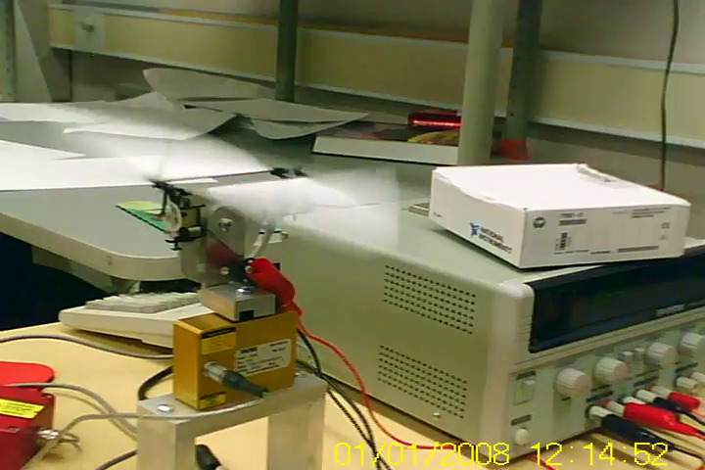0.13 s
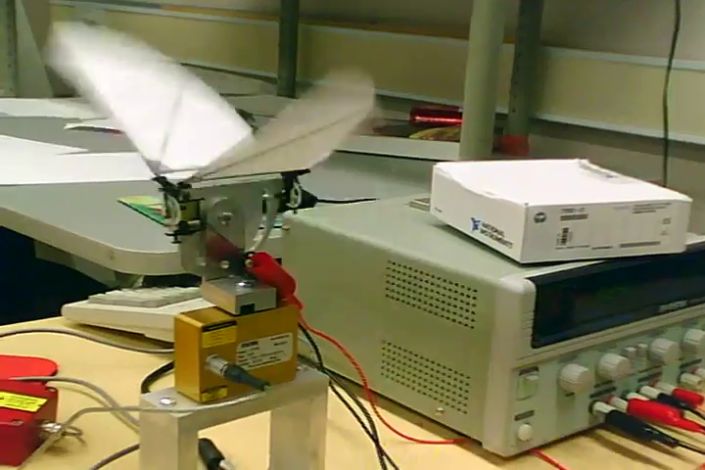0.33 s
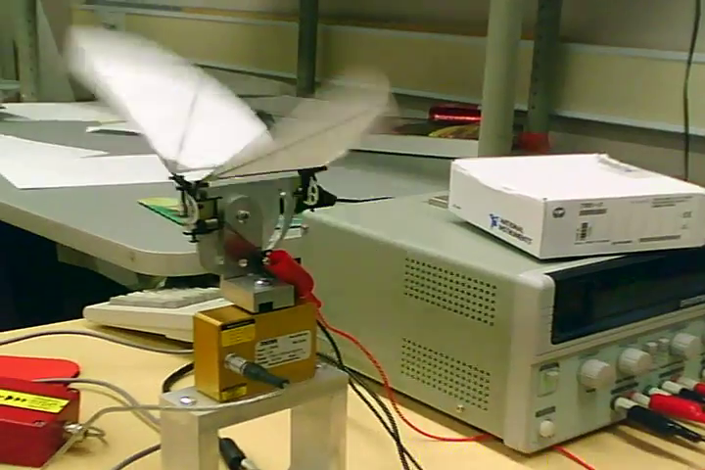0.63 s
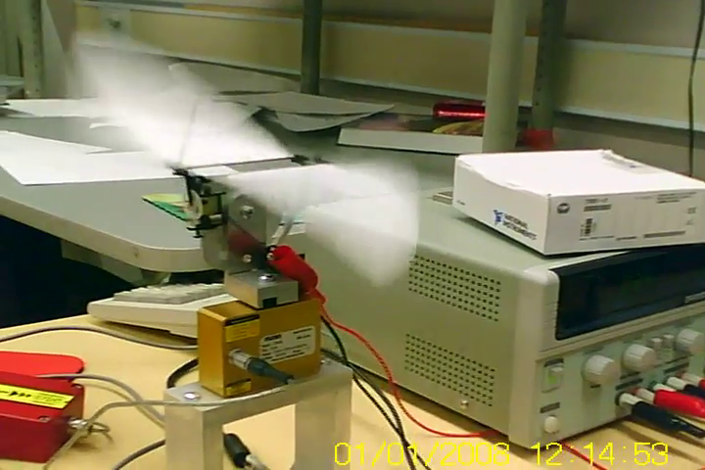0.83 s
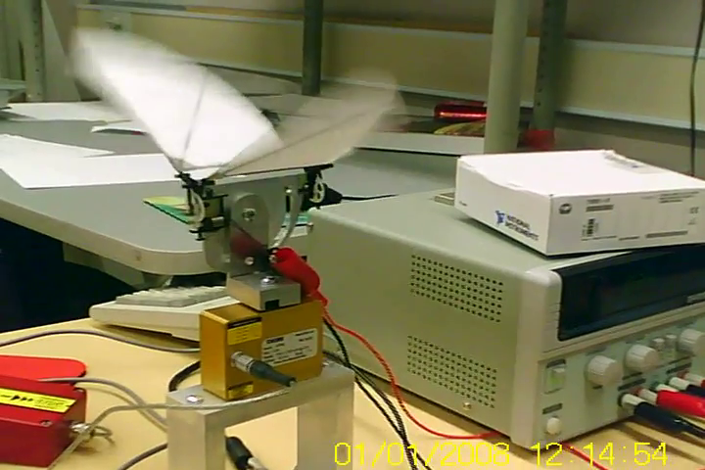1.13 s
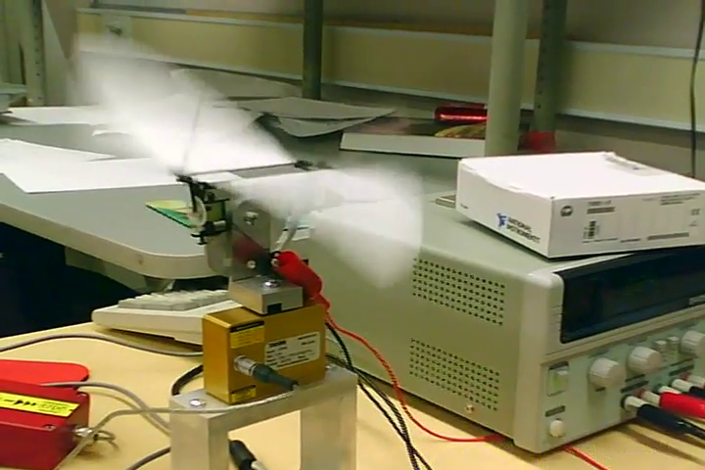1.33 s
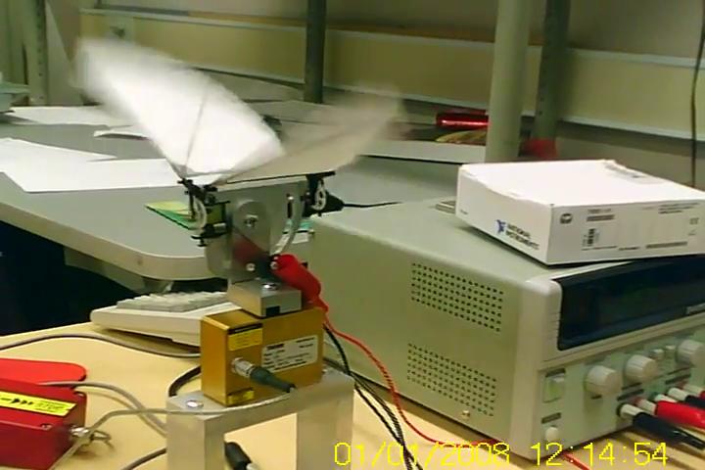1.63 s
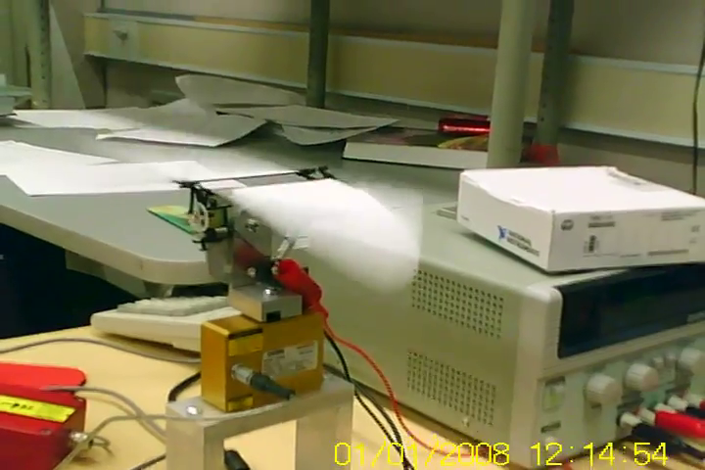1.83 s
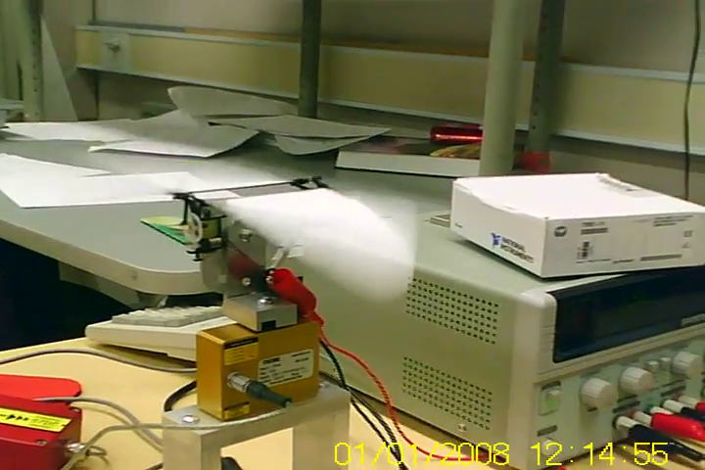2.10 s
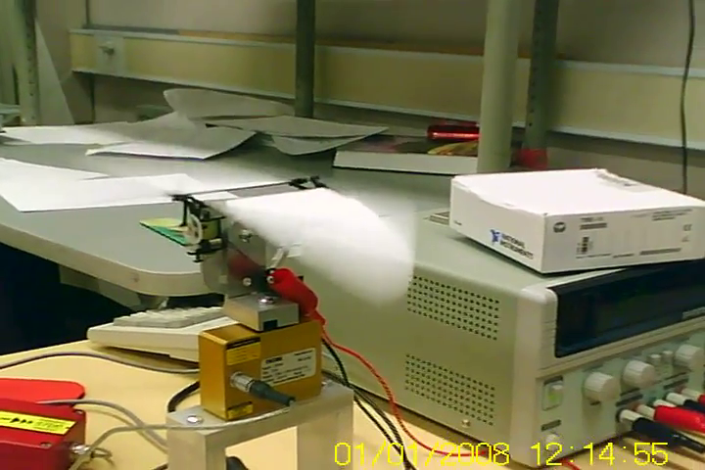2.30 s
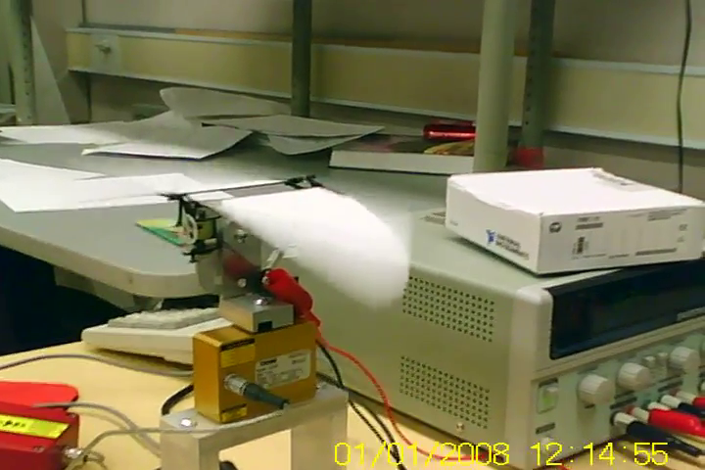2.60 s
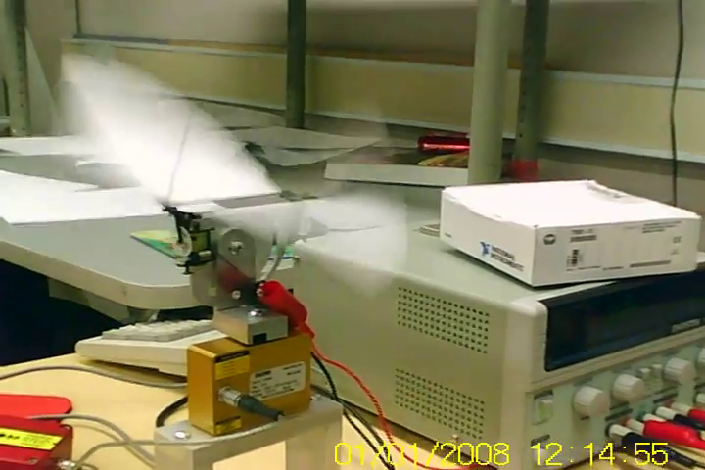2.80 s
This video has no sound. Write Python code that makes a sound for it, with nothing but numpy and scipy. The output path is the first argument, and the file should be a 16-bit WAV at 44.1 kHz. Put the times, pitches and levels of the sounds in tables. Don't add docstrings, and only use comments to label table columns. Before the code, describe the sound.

Small geared motor grinding and clattering about ten times a second, cutting in abruptly after faint hiss

```python
import sys
import numpy as np
from scipy import signal
from scipy.fft import rfft, irfft
from scipy.io import wavfile
from scipy.ndimage import uniform_filter1d

SR = 44100
rng = np.random.default_rng(int(sys.argv[2]) if len(sys.argv) > 2 else 0)


def store_wav(level_fs):
    pcm = np.round(np.clip(np.atleast_2d(level_fs), -1, 1) * 32767)
    wavfile.write(sys.argv[1], SR, pcm.T.astype(np.int16))


def convert_level_to_amplitude(level_db):
    exponent = np.asarray(level_db, float) / 20
    return 10 ** exponent


N = 130095
ON_S, OPEN_S = .03626, .71236


def level(x, db):
    return x * convert_level_to_amplitude(db) / np.sqrt(np.mean(x ** 2))


def band(x, hz, width):
    return signal.lfilter(*signal.iirpeak(hz, hz / width, fs=SR), x)


def coloured(points):
    points = np.array(points)
    hz = np.fft.rfftfreq(N, 1 / SR) + 1
    gain = convert_level_to_amplitude(np.interp(np.log(hz), np.log(points[:, 0]), points[:, 1]))
    return irfft(rfft(rng.standard_normal(N)) * gain, N)


def walk(rate):
    hold = int(SR / rate)
    steps = np.repeat(rng.standard_normal(N // hold + 1), hold)
    return 1.12 * uniform_filter1d(uniform_filter1d(steps, hold), hold)[:N]


def bump(u, rise, fall):
    before = np.exp(-(np.minimum(u, 0) / rise) ** 2)
    after = np.exp(-np.maximum(u, 0) / fall)
    return np.where(u < 0, before, after)


def circuit(t):
    # (frequency [Hz], level [dB rms])
    whine_lines = [(1200, -89), (3892, -87), (4743, -99), (5599, -84), (6202, -98), (7402, -86),
                   (9598, -91), (10637, -103)]
    # (frequency [Hz], density [dB per Hz])
    hiss_points = [(60, -1), (130, -16), (300, -12.5), (1300, -12), (5000, -13), (8500, -12.5),
                   (10000, -13.5), (11500, -28.5)]
    whine = sum(convert_level_to_amplitude(db + 3 + 2.1 * walk(30)) * np.sin(2 * np.pi * hz * t) for hz, db in whine_lines)
    whine = whine * np.where(t < OPEN_S, 1, .5)
    settle_s = 0.22
    offset = -0.0071 + 0.0021 * np.exp(-(t - ON_S) / settle_s)
    hiss = level(coloured(hiss_points), -74)
    return (t >= ON_S) * (hiss + whine + offset)


def lab(t):
    # (frequency [Hz], level [dB rms], wander [dB])
    fan_lines = [(120, -54, 1.5), (303.3, -64.5, 1.5)]
    # (frequency [Hz], level [dB rms])
    motor_lines = [(419, -74), (458, -74), (629, -76), (668, -74), (947, -74), (1125, -73), (1625, -72),
                   (1723, -72)]
    # (frequency [Hz], density [dB per Hz])
    room_points = [(60, -6), (150, -10.5), (300, -14), (600, -19), (1500, -21), (4000, -27), (8000, -26.5),
                   (11500, -53)]
    lines = list(fan_lines) + [(hz, db, 3.0) for hz, db in motor_lines]
    tones = 0
    for hz, db, wander_db in lines:
        loudness = convert_level_to_amplitude(db + 3 + wander_db * walk(12))
        tones = tones + loudness * np.sin(2 * np.pi * hz * t + .3 * wander_db * walk(8))
    return tones + level(coloured(room_points), -50.5) * convert_level_to_amplitude(walk(6.2))


def gears(t):
    # (place in flap cycle [0-1], rise [s], fall [s], rebound after [s], rebound level [dB])
    strokes = [
        (.34, .006, 0.0084, 0.0077, -2.5),
        (.80, .003, 0.0073, 0.012, -10),
    ]
    # (frequency [Hz], width [Hz], grind [dB], top reversal [dB], bottom reversal [dB])
    frame_parts = [(690, 570, -61.5, -75, -59), (1136, 217, -60.5, -80.5, -65),
                   (1582, 630, -57.5, -61.5, -55.5), (2530, 580, -69, -62.5, -61.5),
                   (3030, 710, -65, -64.5, -52), (4045, 1040, -59.5, -56.5, -50),
                   (5940, 460, -65.5, -50, -49), (6260, 225, -65, -53, -54.5), (6650, 255, -64.5, -52, -49),
                   (7730, 660, -61.5, -57.5, -53.5), (8230, 530, -68, -64, -68),
                   (10370, 1180, -71, -68, -64.5)]
    flap_hz, stroke_jitter_s, stroke_scatter_db = 9.96, .001, .8
    teeth_per_s, teeth_spread_db = 9000, 1.5
    mesh_sag_hz, mesh_recover_s = 115, .02
    mesh_share = .72
    mesh_grind_db = -10

    turns = t * flap_hz
    mesh_hz = 1100 * (1 + .01 * walk(14))
    reversals = []
    for place, rise, fall, again, again_db in strokes:
        stroke = np.floor(turns - place + .5).astype(int) + 1
        chance = rng.standard_normal((stroke.max() + 1, 2 + len(frame_parts)))
        u = (turns - place - stroke + 1) / flap_hz - stroke_jitter_s * chance[stroke, 0]
        load = bump(u, rise, fall) + convert_level_to_amplitude(again_db) * bump(u - again, rise, fall)
        reversals.append((load, stroke, chance))
        mesh_hz = mesh_hz - mesh_sag_hz * bump(u + rise, .008, mesh_recover_s)

    mesh = np.diff(np.floor(np.cumsum(mesh_hz / SR)), prepend=0) * convert_level_to_amplitude(2.0 * rng.standard_normal(N))
    mesh = level(mesh, 0)
    out = 0
    for j, (hz, width, grind_db, *hit_db) in enumerate(frame_parts):
        clicks = (rng.random(N) < teeth_per_s / SR) * rng.standard_normal(N)
        teeth = level(clicks * convert_level_to_amplitude(teeth_spread_db * rng.exponential(size=N)), 0)
        hits = 0
        for (load, stroke, chance), db in zip(reversals, hit_db):
            luck = chance[stroke, 1] + chance[stroke, 2 + j]
            hits = hits + load * convert_level_to_amplitude(db + stroke_scatter_db * luck)
        grind = (teeth + convert_level_to_amplitude(mesh_grind_db) * mesh) * convert_level_to_amplitude(grind_db + 1.8 * walk(39.95))
        rattle = hits * (mesh_share * mesh + np.sqrt(1 - mesh_share ** 2) * teeth)

        def ring(x):
            return band(band(x, hz, width), hz, 1.54 * width)

        out = out + ring(grind + rattle) / ring(teeth).std()
    return out


def low_end(t):
    # (first [s], spacing [s], then three depths [thousandths of full scale])
    dip_groups = [(.714, .032, -13, 14, 15), (.845, .035, 17, 11, 21), (.981, .041, 12, 13, 15),
                  (1.124, .041, 13, 14, 14), (1.263, .028, 7, 7, 7), (1.395, .028, 17, 9, 21),
                  (1.544, .034, 21, 16, 14), (1.68, .036, 17, 19, 23), (1.82, .036, 19, 16, 20),
                  (1.96, .035, 21, 20, 3), (2.075, .031, 12, 12, 15), (2.211, .03, 24, 23, 17),
                  (2.344, .034, 20, 17, 19), (2.479, .036, 24, 20, 16), (2.618, .036, 18, 16, 8),
                  (2.723, .036, 19, 22, 13), (2.861, .0350, 15, 15, 2)]
    dip_width_s = .0042
    dips = 0
    for first, gap, *depths in dip_groups:
        for k, depth in enumerate(depths):
            dips = dips + depth * np.exp(-((t - first - k * gap) / dip_width_s) ** 2 / 2)
    low_band = signal.butter(2, [5, 65], "band", fs=SR, output="sos")
    draught = signal.sosfilt(low_band, rng.standard_normal(N))
    return level(draught, -51) - dips / 1000


def slaps(t):
    # (time [s], peak level [dB], main ring [Hz], side rings [dB])
    knocks = [
        (.7815, -37, 3500, -3),
        (1.1845, -39, 3900, -4),
        (1.3369, -26, 1950, -16),
        (1.38655, -20.5, 1950, -8),
        (1.7840, -37, 1770, -3),
        (2.2680, -24, 3900, -4),
    ]
    rise_s, fall_s = .00025, .00045
    out = np.zeros(N)
    u = np.arange(300) / SR
    shape = bump(u - 1.27 * rise_s, rise_s, fall_s)
    side_rings = sum(np.sin(2 * np.pi * hz * u) for hz in (1750, 6300))
    for s, db, hz, side_db in knocks:
        knock = shape * (np.sin(2 * np.pi * hz * u) + convert_level_to_amplitude(side_db) * side_rings)
        start = int(s * SR)
        out[start:start + len(u)] -= convert_level_to_amplitude(db) * knock / np.abs(knock).max()
    return signal.sosfilt(signal.butter(4, 1050, "high", fs=SR, output="sos"), out)


def rustle(t):
    # (start [s], end [s], first band [Hz], last band [Hz], level [dB])
    lifts = [
        (1.40, 1.605, 1800, 3200, -49),
        (2.17, 2.29, 1350, 1700, -55),
    ]
    out = 0
    for start, end, first_hz, last_hz, db in lifts:
        u = (t - start) / (end - start)
        swell = np.interp(u, [0, .25, .93, 1], [0, 1, 1, 0]) * convert_level_to_amplitude(db + 2 * walk(59.7))
        for hz, mix in ((first_hz, 1 - .5 * u), (last_hz, 1.13 * u)):
            scrape = band(band(rng.standard_normal(N), hz, .5 * hz), hz, .8 * hz)
            out = out + swell * mix * level(scrape, 0)
    return out


def scene():
    t = np.arange(N) / SR
    bench = lab(t) + gears(t) + low_end(t) + slaps(t) + rustle(t)
    mic_top = signal.butter(6, 11240, fs=SR, output="sos")
    return (signal.sosfilt(mic_top, bench) * (t >= OPEN_S))[None]


def band_limit(x):
    return signal.sosfilt(signal.butter(12, 12230, fs=SR, output="sos"), x)


def record(dry):
    t = np.arange(N) / SR
    mix = dry + circuit(t)
    return band_limit(mix)


dry = scene()
out = record(dry)
store_wav(out)
```